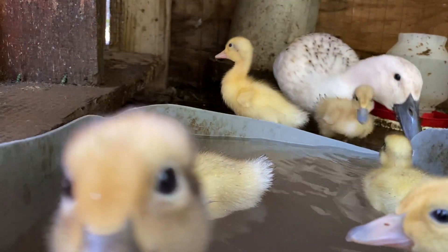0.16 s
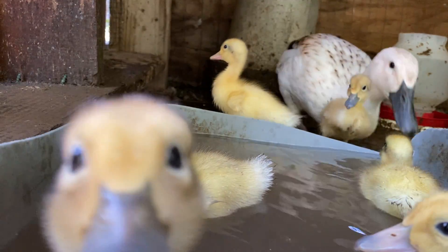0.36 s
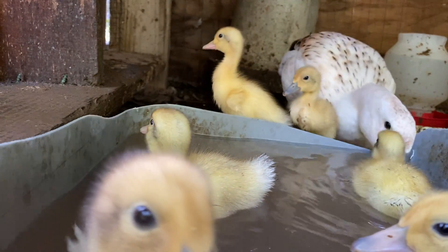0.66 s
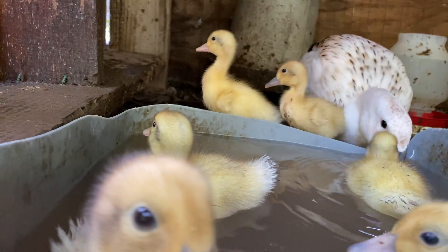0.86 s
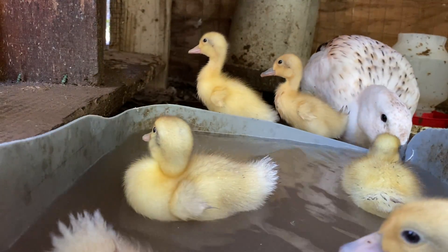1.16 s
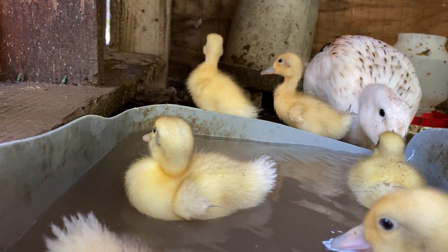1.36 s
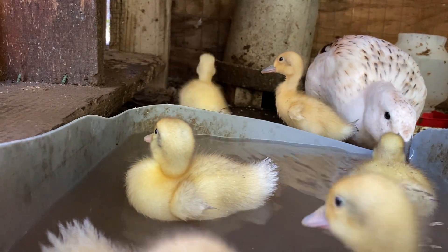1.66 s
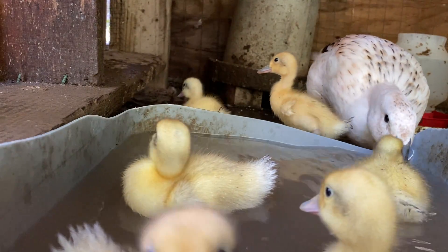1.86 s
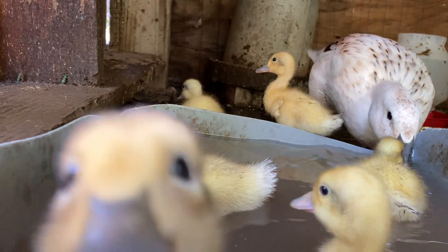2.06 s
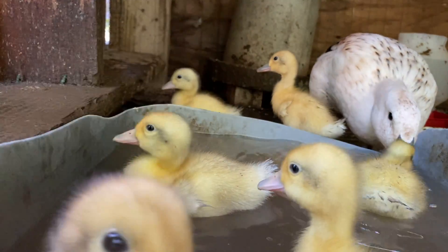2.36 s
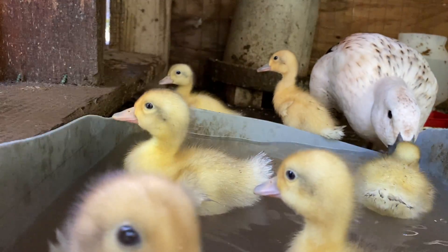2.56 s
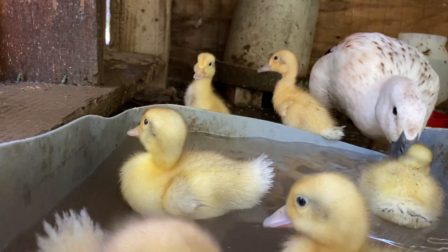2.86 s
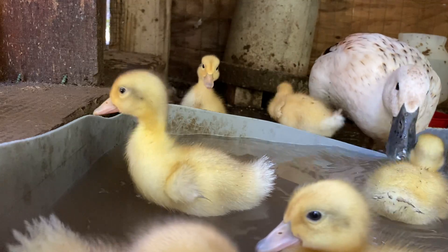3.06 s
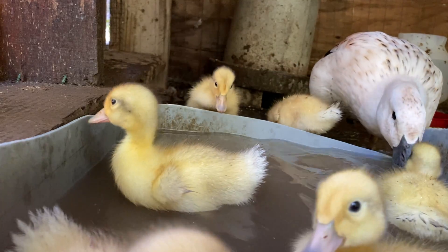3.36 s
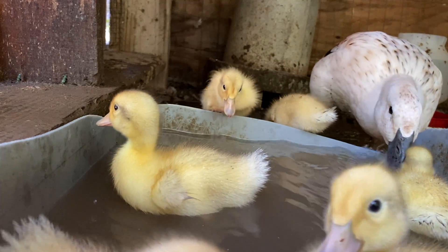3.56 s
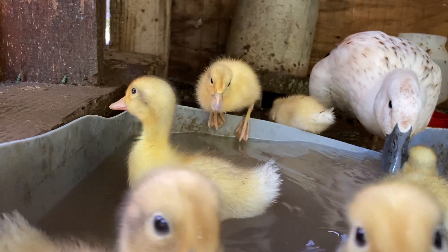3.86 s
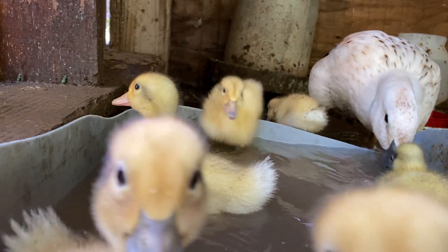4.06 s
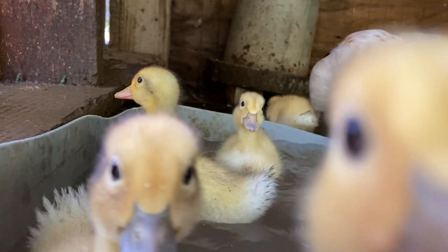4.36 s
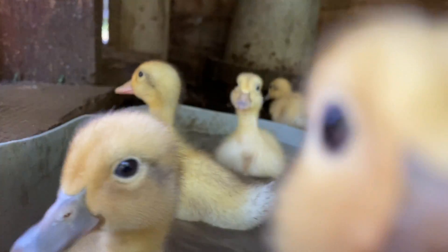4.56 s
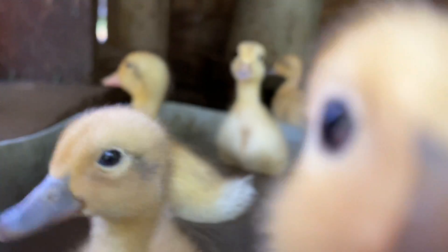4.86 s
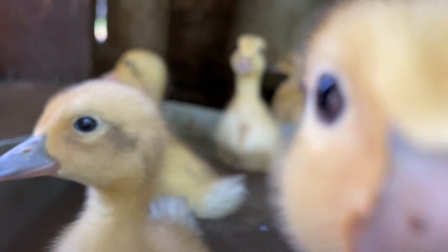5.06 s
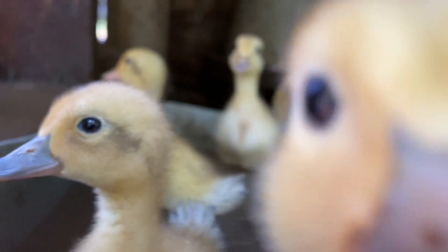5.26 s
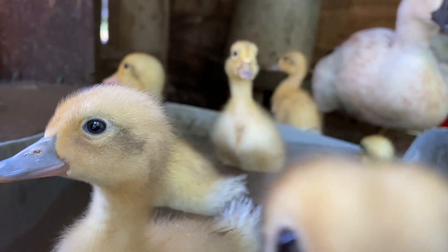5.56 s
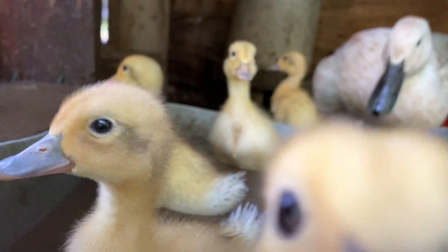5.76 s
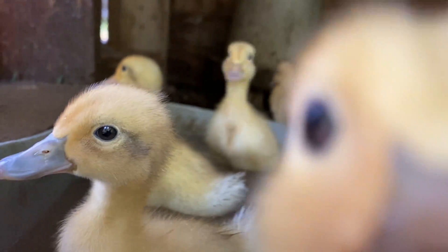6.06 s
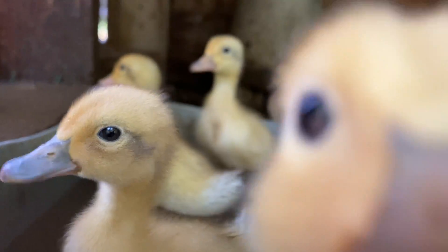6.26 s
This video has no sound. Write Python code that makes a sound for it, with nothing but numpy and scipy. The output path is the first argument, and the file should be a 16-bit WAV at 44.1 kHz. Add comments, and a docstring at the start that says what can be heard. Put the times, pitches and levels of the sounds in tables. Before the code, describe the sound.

Close stereo pickup beside a water tub in a small wooden shed. Several ducklings give brief, thin, arched peeps at irregular gaps while water crackles softly, bubbles plop and bills click. A mother duck grunts very faintly around two seconds. After one loud peep just past four seconds, hollow knocks on boards come in uneven clusters with low rumble, and peeping almost stops.

```python
"""Inside a wooden shed, ducklings paddle in a tub and peep in short arched whistles made from gliding sines.
Water crackles and hisses as filtered noise, with ringing bubbles, sharp ticks, splashes and brushing.
A mother duck grunts once. Knocks on the boards, faint at first and strong after four seconds, ring and boom
as dying sines. The two microphone ports sit apart, so the left one hears most things a little late."""
import sys
import numpy as np
from scipy import signal
from scipy.fft import rfft, irfft, next_fast_len
from scipy.io import wavfile
from scipy.ndimage import uniform_filter1d

SR = 44100
rng = np.random.default_rng(int(sys.argv[2]) if len(sys.argv) > 2 else 0)


def output_pcm(signal):
    """Save a mono or channel-first signal as 16-bit PCM at the path in sys.argv[1].

    Samples are clipped to [-1, 1] before scaling.
    """
    pcm = np.clip(np.atleast_2d(signal).T, -1, 1) * 32767
    wavfile.write(sys.argv[1], SR, np.round(pcm).astype(np.int16))


N = 283110  # length in samples, about 6.4 s

# Ducklings' whistles. Each row: start in seconds, length in seconds, start pitch in Hz, top pitch in Hz
# (the turning point), end pitch in Hz, place of the top as a share of the length, level in dB, end against
# start in dB, octave overtone in dB where the pitch is highest, lag of the left port in ms, share of the
# fall left for the late drop (over 1: it first bends the other way), ends against middle in dB.
PEEP_CALLS = [(0.128, 0.065, 2350, 3246, 2010, 0.48, -40, -12, -31, 0.34, 0.3, -12.5),
              (0.164, 0.13, 3420, 3940, 2660, 0.094, -48, 0, -16, 0.32, 0.057, -26),
              (0.453, 0.084, 2280, 4000, 2480, 0.39, -41.5, -11, -17.5, 0.33, 0.05, -5),
              (0.48, 0.0583, 2567, 3880, 2500, .6, -52, 0, -30, 0.316, .3, -5),
              (0.582, 0.057, 2210, 4115, 4580, 0.64, -38.5, 1.5, -27, 0.28, 2.3, -2.5),
              (0.605, 0.091, 2433, 3080, 2190, 0.38, -40, -11, -24, 0.39, 0.14, -10.5),
              (0.785, 0.069, 2430, 3500, 2800, 0.46, -40.5, 2, -22, 0.36, 0.54, 4),
              (0.878, 0.097, 2140, 2900, 2210, 0.6, -54, 19, -32, 0.31, 0, -8),
              (1.174, 0.08, 2350, 4540, 2150, 0.67, -52, -7, -15, 0.25, 0.54, 6.5),
              (1.264, 0.031, 3350, 1670, 1690, 0.84, -33.5, -13, 0.5, 0.29, .3, -19.5),
              (1.33, 0.05, 2600, 3784, 2240, 0.69, -42.5, -1, -15, 0.18, 0.91, -6),
              (1.618, 0.067, 2290, 3216, 2050, 0.39, -39.5, -7, -21, 0.41, 0.35, -14),
              (1.805, 0.07, 2540, 3606, 2440, 0.47, -41, 1, -25, 0.42, 0.43, 2),
              (2.201, 0.061, 2160, 3200, 2030, 0.67, -41, 7, -12, 0.12, 0.32, -6),
              (2.407, 0.073, 2150, 3523, 2320, 0.6, -37.5, 2, -18.5, 0.19, 0.36, -2),
              (2.632, 0.06, 2110, 3180, 1930, 0.41, -42, 0.5, -36, 0.28, 0.72, 0.5),
              (2.669, 0.084, 3370, 3295, 2690, 0.17, -44.5, 9, -23.5, 0.28, 0, 1.5),
              (2.919, 0.08, 2100, 4630, 2200, 0.53, -35.5, -9, -22, 0.269, 0.06, -20),
              (3.017, 0.071, 2150, 3090, 2080, 0.44, -41, 3, -45, 0.12, 0.83, -3.5),
              (3.199, 0.088, 2430, 3590, 1980, 0.68, -41, 5, -14.5, 0.12, 0.17, -8),
              (3.22, 0.045, 5100, 4330, 4220, .9, -55, -7, -30, 0.24, .3, -7),
              (3.565, 0.11, 2190, 3310, 2170, 0.28, -39.5, 1, -21, 0.27, 0.38, -11),
              (3.695, 0.072, 2070, 3135, 2180, 0.37, -40, 1.5, -53, 0.085, 0.82, 0),
              (3.887, 0.072, 2005, 3515, 2600, 0.45, -43, 4.5, -20, 0.11, 0.55, 7),
              (3.9, 0.046, 4400, 4500, 4250, 0.18, -58.5, 0, -36, 0.18, .2, -7),
              (4.117, 0.1, 1840, 3460, 2065, 0.15, -22.5, -8.5, -27, 0.38, 0.13, -13.5),
              (5.539, 0.059, 2170, 3210, 1960, 0.46, -42, -2, -61, 0.39, 0.25, -3)]
# Bubbles closing under bills and feet. Each row: start in seconds, level in dB, pitch in Hz,
# cycles to fall to about a third.
DRIP_BUBBLES = [(0.556, -32, 2510, 1.8), (0.611, -19.5, 2540, 1.4), (0.659, -22, 2060, 5.2),
                (.665, -20.5, 2700, 2.3), (1.161, -41.5, 2980, 5.9), (1.329, -26.5, 2410, 0.57),
                (1.403, -31, 2800, 0.55), (1.428, -46.5, 2040, 18), (1.454, -42, 2250, 3.2),
                (1.476, -25.5, 2550, 1.07), (1.628, -26, 1180, 1.36), (1.655, -40, 2230, 6.7),
                (1.831, -22, 1290, 0.93), (1.848, -33, 956, 3.3), (1.862, -28, 2250, 8.2),
                (1.948, -26, 2156, 9.8), (2.403, -25.5, 930, 0.45), (2.808, -38.5, 827, 2.5),
                (3.13, -38.5, 950, 2.6), (3.152, -34, 2170, 3), (3.211, -30, 720, 1.6),
                (3.293, -29.5, 730, 0.97), (3.315, -27, 1000, 0.75), (3.528, -18.5, 2050, 0.83),
                (3.832, -31, 2120, 2.8), (3.857, -25.5, 980, 1.9), (4.085, -27.5, 806, 1.6),
                (4.608, -38, 2720, 2.2), (4.804, -24.5, 2010, 2), (5.24, -37.5, 3000, 3.3),
                (5.613, -41, 1800, 1.8), (5.728, -35.5, 2740, 1.5), (5.899, -31.5, 2210, 3.6),
                (5.968, -22.5, 2880, 2.4), (6.078, -35, 2780, 1.7), (6.143, -31.5, 3070, 8.7),
                (6.158, -40, 2180, 4), (6.22, -34, 2360, 1.9)]
# Droplets and bill snaps. Each row: start in seconds, level of the core in dB, centre in Hz.
TICK_SNAPS = [(0.649, -35.5, 5750), (0.6688, -27.5, 7230), (0.878, -41.5, 6700), (1.149, -48.5, 5500),
              (1.3006, -43, 5040), (1.478, -42.5, 6850), (1.667, -33, 13200), (2.229, -28.5, 5070),
              (2.364, -43.5, 9600), (3.194, -46, 10100), (3.2112, -34, 5600), (3.339, -40, 4900),
              (3.527, -25, 5500), (4.085, -35.5, 5540), (4.114, -27, 4900), (4.6609, -38, 10300),
              (4.806, -33.5, 9100), (4.862, -40.5, 4660), (5.1553, -34.5, 8700), (5.265, -39, 7460),
              (5.2911, -40.5, 5030), (5.562, -31.5, 6960), (5.876, -42.5, 6900), (6.092, -39, 7100),
              (6.1243, -39.5, 4650)]
# Blows on the boards. Each row: start in seconds, level in dB, boom against ring in dB,
# crack against level in dB (each part also has its own fixed gain).
BOARD_BLOWS = [(0.326, -41.5, -12, -13), (0.36, -46.5, -10, -41), (4.226, -19.5, -24, -23),
               (4.481, -26, -32, -28), (4.51, -27.5, -37, -28), (4.532, -25, -15.5, -13.5),
               (4.541, -29, -27, -2), (4.68, -37, -17.5, -28), (4.84, -23.5, -16.5, -26),
               (4.875, -29.5, -43, -19.5), (4.901, -22.5, -20.5, -18.5), (5.043, -40.5, -5.5, -37),
               (5.153, -25.5, -17, -46), (5.178, -22, -21, -27), (5.29, -36, -23, -11.5),
               (5.562, -30, -59, -19), (5.638, -29, -35, -19), (5.778, -32, -42, -25.5),
               (5.885, -32.5, -50, -30), (5.965, -22, -43, -20.5), (5.989, -20, -13.5, -21),
               (6.019, -24.5, -30, -22), (6.049, -29, -16, -10.5), (6.06, -20.5, -21, -13.5),
               (6.311, -27, -12, -15), (6.357, -31, -24, -12)]
# Notes of the board. Each row: pitch in Hz, relative level in dB, time to fall 60 dB in seconds.
BOARD_NOTES = [(593.5, 4, 0.032), (627, 7, 0.037), (676.6, 7.5, 0.028), (777, -2, 0.041), (435, 2.5, 0.04)]
# Notes of the wall panels. Each row: pitch in Hz, relative level in dB, time to fall 60 dB in seconds.
WALL_NOTES = [(93.4, 5, 0.22), (142, 18, 0.0083), (215, 3.5, 0.038)]
# Background levels over time. Each row: time in seconds, rumble in dB, board rattle in dB.
RUMBLE_LEVELS = [(0, -56, -79), (3.7, -55.5, -77), (4.2, -48.5, -56), (4.3, -45, -67), (4.7, -42, -63),
                 (5.1, -41, -59.5), (5.45, -48, -67.5), (5.9, -44, -63.5), (6.42, -51.5, -49)]
# Colour of the rumble. Each row: frequency in Hz, relative level in dB per Hz.
RUMBLE_COLOUR = [(15, -64), (25, -16), (59, -4), (83, 0), (156, -12.5), (254, -19), (500, -31.5),
                 (650, -100)]
# Colour of the water. Each row: frequency in Hz, relative level in dB per Hz.
WATER_COLOUR = [(700, -5.5), (1400, -5.5), (2400, -8.5), (4000, -15), (7000, -14), (11000, -16),
                (16000, -22)]
# How far the left port trails for sounds off the water. Each row: frequency in Hz, phase in radians.
WATER_TRAIL = [(0, 0), (1200, 2.2), (2600, 6), (6500, 6), (9400, 9.6), (16500, 19.9)]
# Slaps on the water. Each row: start in seconds, level in dB, time to fall 60 dB in seconds.
WATER_SLAPS = [(0.389, -47.5, 0.16), (5.036, -34.5, 0.13), (6.248, -49.5, 0.2)]
# Wet feathers and feet brushing the tub. Each row: start in seconds, length in seconds, level in dB.
TUB_BRUSHES = [(0, 0.028, -59), (3.856, 0.034, -49.5), (4.08, 0.059, -50.5)]
# How much the water is stirred between splashes. Each row: time in seconds, relative level in dB.
PADDLING_LEVELS = [(0, -77), (.4, -74), (.89, -72), (1.03, -80), (1.8, -75), (2.86, -81), (3.14, -63),
                   (3.33, -70), (3.44, -79), (4.0, -64.5), (4.38, -65), (5.0, -60.5), (5.3, -72),
                   (5.4, -79.5), (5.9, -68.5), (5.97, -64.5), (6.42, -72)]

GRUNT_S, GRUNT_LENGTH_S, GRUNT_HZ, GRUNT_DB = 2.186, 0.074, 259.6, -52  # the mother duck
TOP_HZ = 16500  # treble limit
SPLASH_DB, SPLASH_RISE_S, SPLASH_FALL_S = -40, 0.005, 0.02  # stir around each drip and tick, against its level
RISE_BEND, SAG_BEND, DROP_BEND = 2.5, 1.3, 6  # powers of time: the climb, the slow sag, the late drop
SPOT_DETUNE = .025  # each blow lands elsewhere on the board and shifts its notes (spread as a share of pitch)


def undb(db):
    """Turns dB into a plain multiplier."""
    return 10 ** (np.asarray(db) / 20)


def clock(seconds):
    """Times in seconds, one for each sample."""
    return np.arange(int(seconds * SR)) / SR


def add(out, s, x):
    """Mixes x into out from s seconds on, cut at the end."""
    i = int(s * SR)
    out[..., i:i + x.shape[-1]] += x[..., :N - i]


def curve(table):
    """Draws straight lines between table rows, one curve per column after the time."""
    s, *columns = np.transpose(table)
    return [np.interp(np.arange(N) / SR, s, c) for c in columns]


def walk(rate):
    """Random levels held 1 / rate seconds and smoothed twice; spread near 1."""
    hold = int(SR / rate)
    steps = np.repeat(rng.standard_normal(N // hold + 1), hold)
    return 1.3 * uniform_filter1d(uniform_filter1d(steps, hold), hold)[:N]


def band(x, lo_hz, hi_hz):
    """Keeps the sound between two frequencies."""
    return signal.sosfilt(signal.butter(2, [lo_hz, min(hi_hz, .45 * SR)], "band", fs=SR, output="sos"), x)


def coloured(x, spectrum):
    """Shapes x by (Hz, dB) points and scales it to an rms of 1."""
    hz, db = np.transpose(spectrum)
    f = np.arange(x.shape[-1] // 2 + 1) * SR / x.shape[-1]
    gain = undb(np.interp(np.log(f + 1), np.log(hz), db))
    y = irfft(rfft(x) * gain, x.shape[-1])
    return y / np.std(y)


def ports(x, pan_db, lag_ms=None):
    """Left and right, the left one late: sound takes time to cross from port to port."""
    size = next_fast_len(len(x) + 64)
    hz = np.arange(size // 2 + 1) * SR / size
    if lag_ms is None:
        trail = np.interp(hz, *np.transpose(WATER_TRAIL))
    else:
        trail = 2 * np.pi * hz * lag_ms / 1000
    late = irfft(rfft(x, size) * np.exp(-1j * trail), size)
    return np.array([late[:len(x)] * undb(pan_db / 2), x * undb(-pan_db / 2)])


def shed(x, t60, db):
    """Diffuse tail of the shed: fading noise as an echo pattern, unlike in the two ports."""
    t = clock(0.54)
    tail = rng.standard_normal((2, len(t))) * 1000. ** (-t / t60) * np.minimum(t / 0.0045, 1)
    tail = tail / np.sqrt(np.sum(tail[0] ** 2))
    return undb(db) * signal.fftconvolve(x[None], tail, axes=1)[:, :N]


def bubble(hz, cycles, glide):
    """A damped sine that rises as the bubble nears the surface."""
    turns = clock(5 * cycles / hz) * hz
    tone = np.sin(2 * np.pi * turns * (1 + glide * turns / cycles))
    return tone * np.exp(-turns / cycles) * np.minimum(turns, 1)


def stirring():
    """Paddling plus a splash that builds up to each drip and tick and dies away after it, in dB."""
    t, power = np.arange(0, N, 64) / SR, 0
    for s, db, *_ in DRIP_BUBBLES + TICK_SNAPS:
        shape = np.exp(-np.maximum((s - t) / SPLASH_RISE_S, (t - s) / SPLASH_FALL_S))
        power = power + undb(2 * (db + SPLASH_DB)) * shape  # doubled dB gives power
    paddling_power = undb(2 * curve(PADDLING_LEVELS)[0])
    return 10 * np.log10(paddling_power + np.interp(np.arange(N) / SR, t, power))


def water(stir_db):
    """Dense crackle of small drops, each with its own colour, over a patchy hiss, and scattered small bubbles."""
    drops = (rng.random(N) < 800 / SR) * undb(3.0 * rng.exponential(size=N))  # about 800 a second
    fade = np.exp(-clock(.02) / 0.003)  # every drop dies away in a few milliseconds
    near, lapping = 0, walk(21.815)
    for hz in 700 * 2. ** np.arange(5):  # octave bands
        # fresh drop strengths in each band give every drop its own colour
        spatter = signal.fftconvolve(drops * rng.standard_normal(N) ** 2, fade)[:N]
        crackle = spatter * rng.standard_normal(N)
        hiss = rng.standard_normal(N) * undb(2.5 * lapping + 5 * walk(40))
        near = near + band(1.7 * crackle / np.std(crackle) + 0.55 * hiss, hz / 1.3, hz * 1.45)
    small = np.zeros(N)
    for when, pitch, size in rng.random((200, 3)):
        add(small, when * N / SR, undb(10 * size) * bubble(900 * 2 ** (2.2 * pitch), 2.28, 0.035))
    near = coloured(near, WATER_COLOUR) + undb(10.5) * small
    # a separate hiss for each port
    apart = coloured(band(rng.standard_normal((2, N)), 300, 7100), WATER_COLOUR)
    apart = apart * undb(3 * lapping + 4 * walk(50))
    return undb(stir_db) * 2 * (ports(near, 0.75) + undb(-6) * apart)


def rumble(low_db, rattle_db):
    """Low outdoor rumble through the walls and a faint rattle of the boards, both from filtered noise."""
    low = coloured(rng.standard_normal((3, N)), RUMBLE_COLOUR) * undb(low_db + 1.5 * walk(10))
    rattle = band(rng.standard_normal(N), 318, 815)
    rattle = rattle / np.std(rattle) * undb(rattle_db + 5.8 * walk(25))
    return low[0] + undb(-12) * low[1:] + ports(rattle, 0.87, 0.21)  # mostly shared, a little of its own per port


def brushes():
    """Short gritty scrapes, strongest low down: noise whose strength jumps in small steps."""
    out = np.zeros(N)
    for s, length, db in TUB_BRUSHES:
        t = clock(length)
        grit = rng.standard_normal(len(t)) * np.repeat(rng.random(len(t)) * 2, 90)[:len(t)]
        swell = np.sin(np.pi * (t / length) ** .6)
        add(out, s, undb(db) * 6 * band(grit, 200, 1500) * swell)
    return ports(out, 0.51, 0.054)


def arch(u, start_hz, top_hz, end_hz, top_at, drop):
    """Pitch moves from the start to the turning point, sags, and falls away at the very end."""
    before = np.clip(1 - u / top_at, 0, 1)
    after = np.clip((u - top_at) / (1 - top_at), 0, 1)
    fall = (1 - drop) * after ** SAG_BEND + drop * after ** DROP_BEND
    return top_hz + (start_hz - top_hz) * before ** RISE_BEND + (end_hz - top_hz) * fall


def ducklings():
    """Near-sine whistles of the syrinx with weak overtones and a slightly unsteady breath."""
    out, breath = np.zeros((2, N)), undb(2.1 * walk(110))
    flutter = 1 + .009 * walk(160)  # the pitch wavers slightly
    for (s, length, start_hz, top_hz, end_hz, top_at, db, tilt_db, octave_db,
         lag_ms, drop, ends_db) in PEEP_CALLS:
        t = clock(length + .003)
        u = t / length
        hz = arch(u, start_hz, top_hz, end_hz, np.clip(top_at, .05, .95), np.maximum(drop, 0))
        phase = 2 * np.pi * np.cumsum(hz * flutter[int(s * SR):][:len(t)]) / SR
        edge = np.clip(t / 0.0054, 0, 1) * np.clip((length - t) / 0.00067, 0, 1)  # soft start, quick stop
        strain = (hz / hz.max()) ** 5  # overtones show only near the highest pitch
        overtones = undb(octave_db) * np.sin(2 * phase) + undb(-40) * np.sin(3 * phase)
        tone = np.sin(phase) + strain * overtones
        swell_db = db + tilt_db * (u - .5) + ends_db * (2 * u - 1) ** 2
        add(out, s, ports(tone * edge * undb(swell_db), 3.7, lag_ms))
    return out * breath


def ring(modes, seconds):
    """Struck wood as a sum of sines, each dying at its own pace."""
    t = clock(seconds)
    return sum(undb(db) * np.sin(2 * np.pi * hz * t) * 1000. ** (-t / t60) for hz, db, t60 in modes)


def knocks():
    """Each blow cracks and rings the board; bending waves bring the low notes later and set the walls booming."""
    rings, booms, cracks, t = np.zeros(N), np.zeros(N), np.zeros(N), clock(0.024)
    # the bending wave slides down from about 520 Hz towards 70 Hz
    sweep = np.sin(2 * np.pi * np.cumsum(70 + 450 * np.exp(-t / 0.00656)) / SR)
    sweep = sweep * np.exp(-t / 0.032) * np.minimum(t / 0.0067, 1)
    for s, db, boom_db, crack_db in BOARD_BLOWS:
        spot = []
        for hz, mode_db, t60 in BOARD_NOTES:
            detune = 1 + SPOT_DETUNE * rng.standard_normal()
            spot.append((hz * detune, mode_db + 2 * rng.standard_normal(), t60))
        board = ring(spot, .12) * np.minimum(clock(.12) / 0.0044, 1)
        add(rings, s, undb(db) * 1.374 * board / np.abs(board).max())
        add(cracks, s - .001, undb(db + crack_db) * band(8.1 * np.exp(-t / 0.00013), 710, 2580))
        add(booms, s + 0.00319, undb(db + boom_db) * 5.93 * sweep)
        walls_ring = ring(WALL_NOTES, .5) * np.minimum(clock(.5) / 0.0044, 1)
        add(booms, s + 0.01318, undb(db + boom_db) * walls_ring)
    direct = ports(rings + shed(rings, 0.65, -8.0)[0], 1.16, 0.28)
    direct = direct + ports(booms, -0.054, .02) + ports(cracks, 9.0, 0.025)
    walls = shed(band(booms, 226, 480), 0.36, 0.1)
    return direct + walls + shed(rings, 0.47, -5.5) + shed(cracks, 0.18, -3.0)


def splashes():
    """A sudden gritty burst of noise as spray, only partly alike in the two ports."""
    out = np.zeros((2, N))
    for s, db, t60 in WATER_SLAPS:
        t = clock(t60)
        grit = np.repeat(rng.exponential(size=len(t)), 40)[:len(t)] ** .5
        fade = 1000. ** (-(t / t60) ** 0.77)
        spray = band(rng.standard_normal((3, len(t))) * grit * fade, 690, 10700)
        add(out, s, undb(db) * (ports(spray[0], 0) + spray[1:]))
    return out


def drips():
    """The loud bubbles: trapped air rings as a short damped sine."""
    out = np.zeros((2, N))
    for s, db, hz, cycles in DRIP_BUBBLES:
        x = bubble(hz, cycles, 0.017)
        add(out, s, ports(undb(db) * x, 4 + 1.5 * rng.standard_normal()))
    return out


def ticks():
    """A sharp broad crack with a coloured core and a short spray, all from fading noise."""
    out, t = np.zeros((2, N)), clock(0.028)
    for s, db, hz in TICK_SNAPS:
        noise = rng.standard_normal((2, len(t))) * np.minimum(t / 0.00059, 1)
        core = band(noise[0] * np.exp(-t / 0.0012), 0.9 * hz, 1.13 * hz)
        spray_fade = 0.1 * np.exp(-t / 0.000049) + 0.23 * 1000. ** (-t / 0.026)
        spray = band(noise[1] * spray_fade, 2000, 12000)
        x = core / np.abs(core).max() + 2.03 * spray
        add(out, s, ports(undb(db) * x, 2 * rng.standard_normal()))
    return out


def grunt():
    """A soft, slightly rough low call: throat pulses with many overtones."""
    out, t = np.zeros((2, N)), clock(GRUNT_LENGTH_S)
    phase = 2 * np.pi * np.cumsum(GRUNT_HZ * (1 + .11 * walk(250)[:len(t)])) / SR
    tone = 0
    for k in range(1, 9):
        wobble = undb(5 * walk(200)[:len(t)])
        tone = tone + np.cos(k * phase + rng.standard_normal()) * k ** -.5 * wobble
    swell = np.sin(np.pi * t / GRUNT_LENGTH_S)
    add(out, GRUNT_S, ports(undb(GRUNT_DB) * tone * swell, 2.4, 0.2))
    return out


def scene():
    """Mixes the tub, its short echo, the knocks, the water and the rumble."""
    near = brushes() + ducklings() + splashes() + drips() + ticks() + grunt()
    echo = shed(near[1], 0.08, -11)
    return water(stirring()) + rumble(*curve(RUMBLE_LEVELS)) + near + echo + knocks()


def record(dry):
    """The recorder cuts the top with a steep low-pass filter."""
    return signal.sosfilt(signal.ellip(10, .2, 70, TOP_HZ, fs=SR, output="sos"), dry)


dry = scene()
out = record(dry)
output_pcm(out)
```